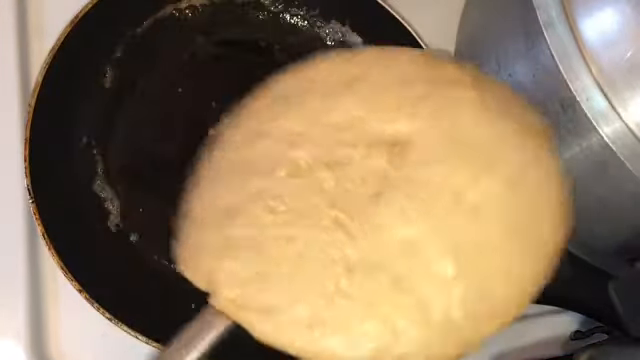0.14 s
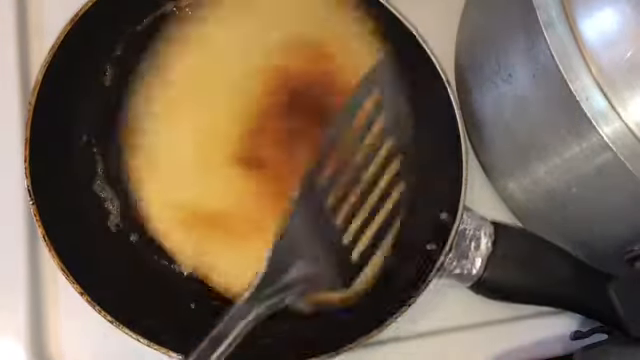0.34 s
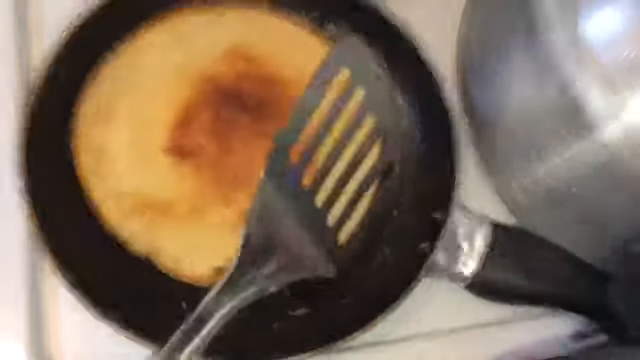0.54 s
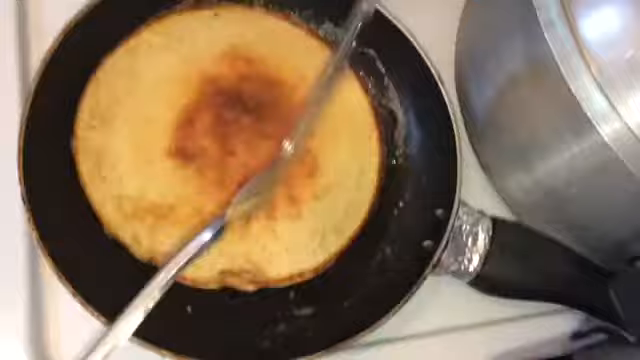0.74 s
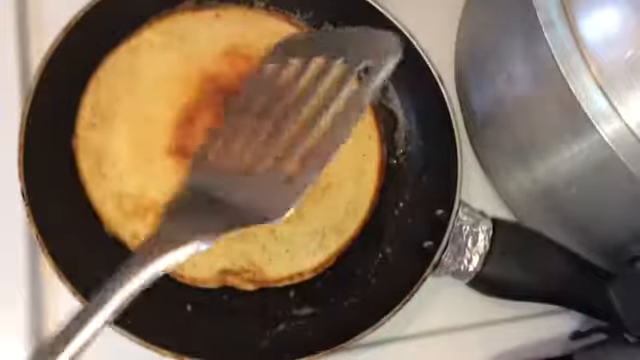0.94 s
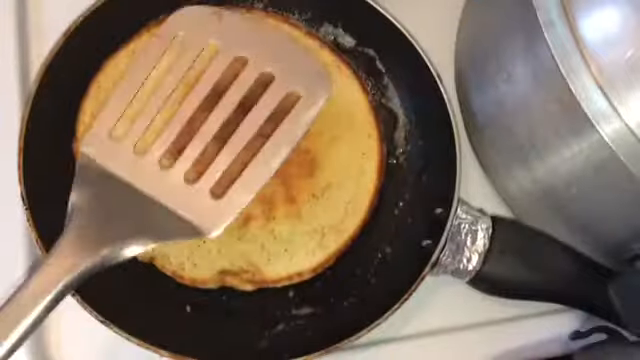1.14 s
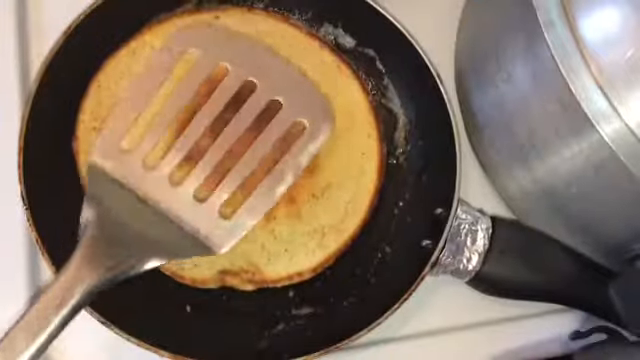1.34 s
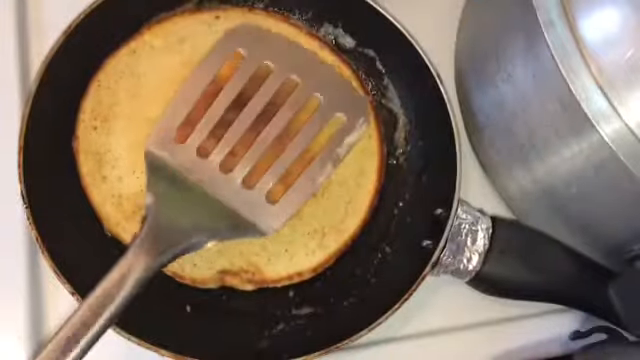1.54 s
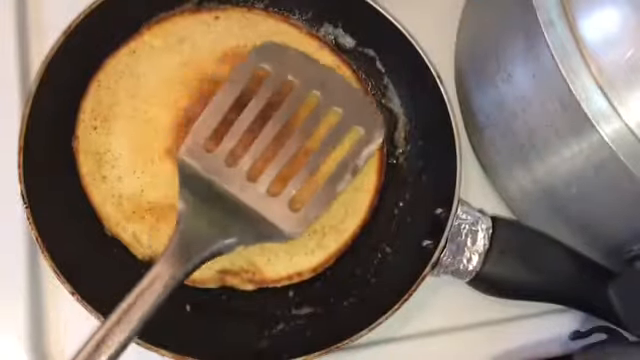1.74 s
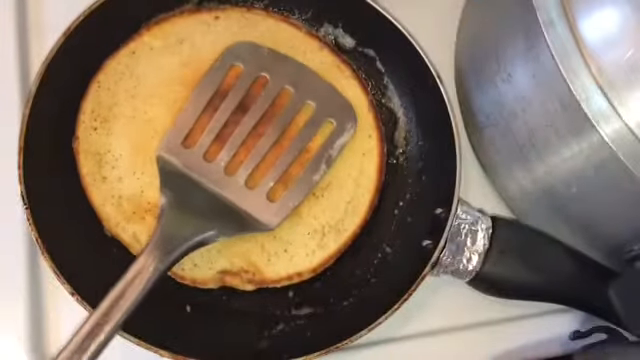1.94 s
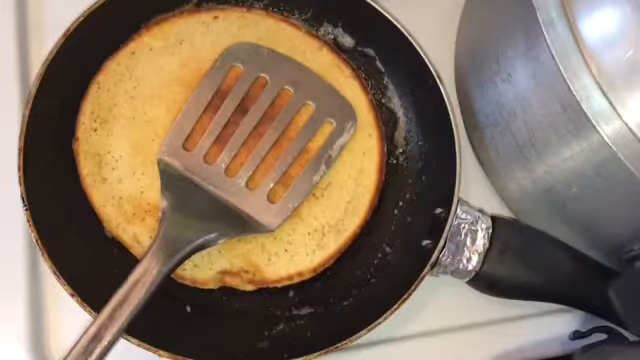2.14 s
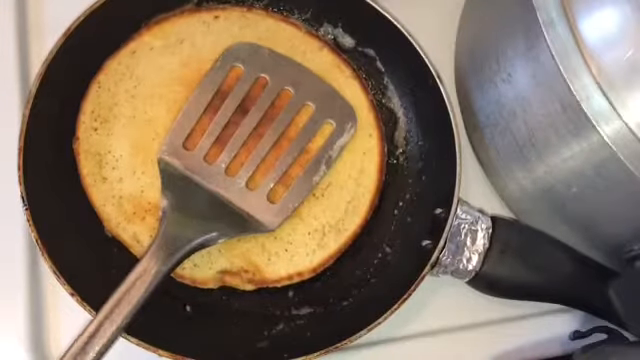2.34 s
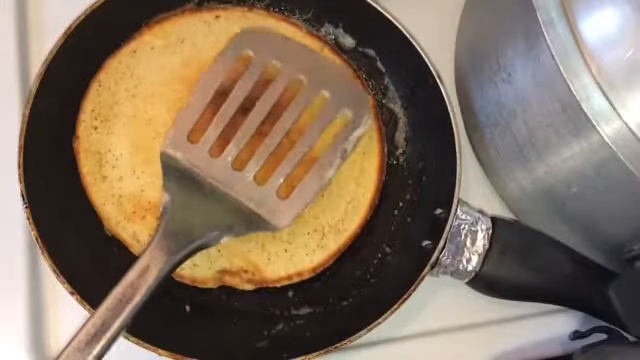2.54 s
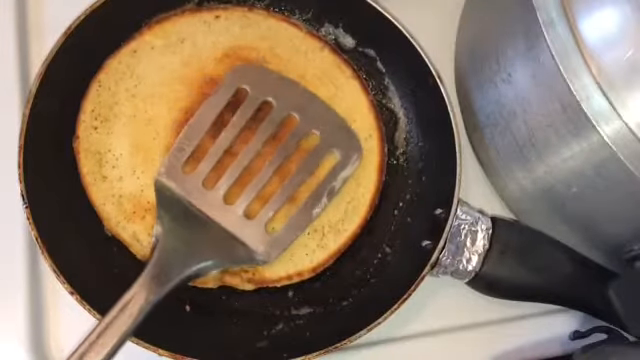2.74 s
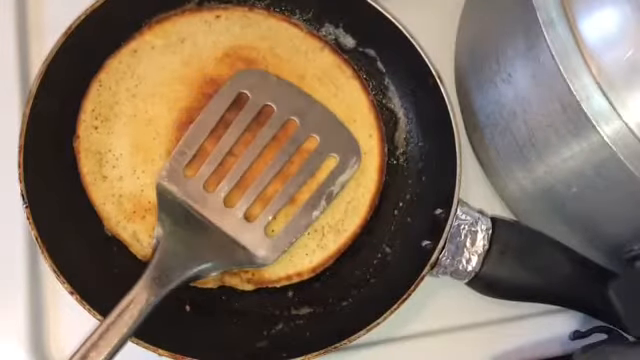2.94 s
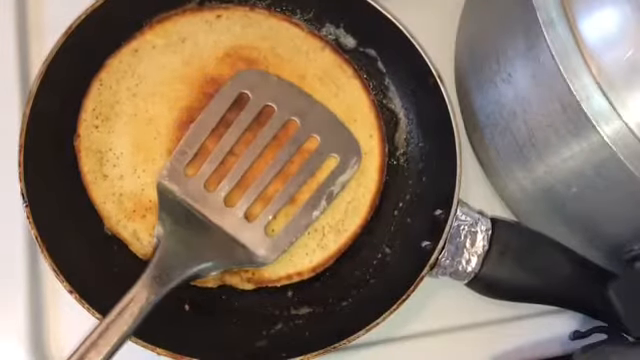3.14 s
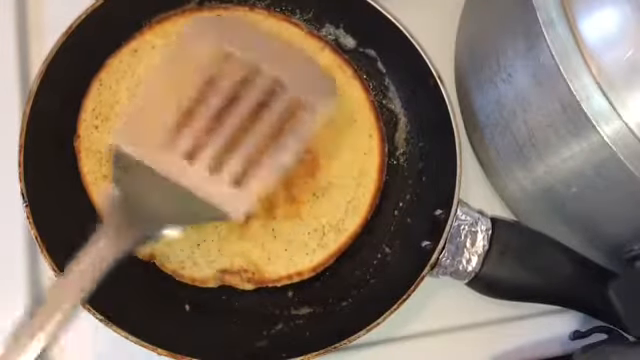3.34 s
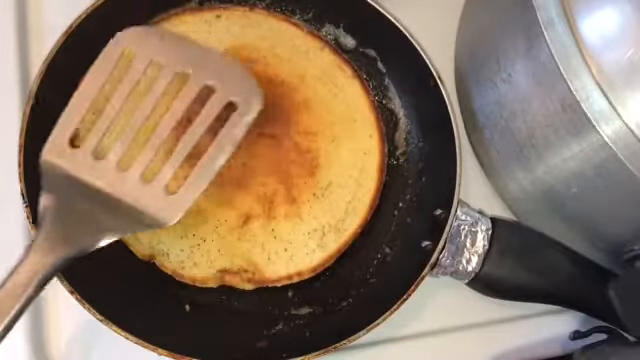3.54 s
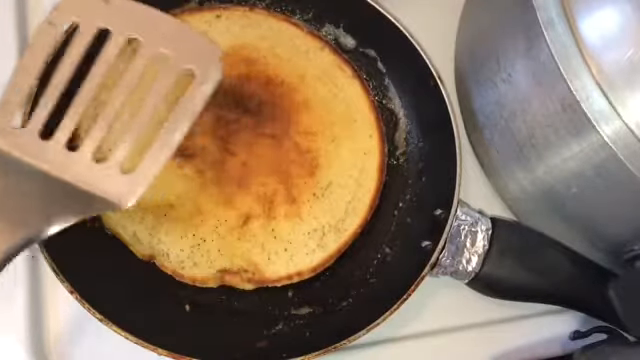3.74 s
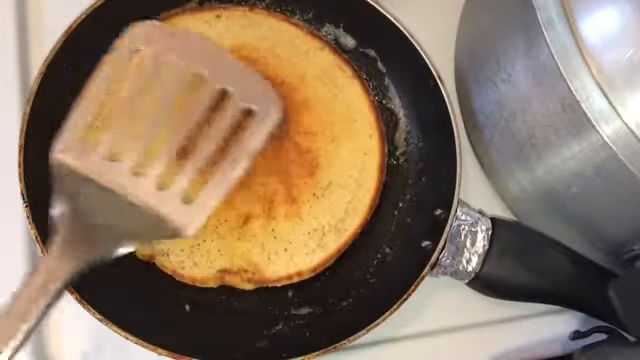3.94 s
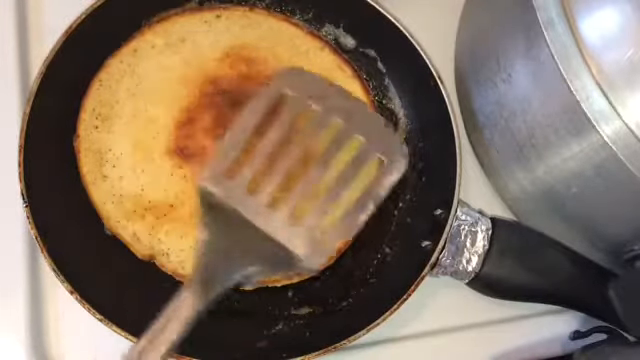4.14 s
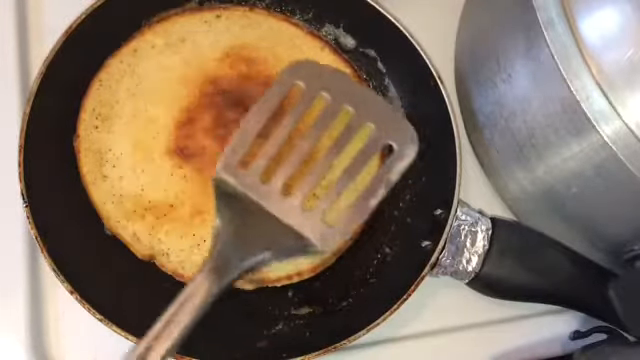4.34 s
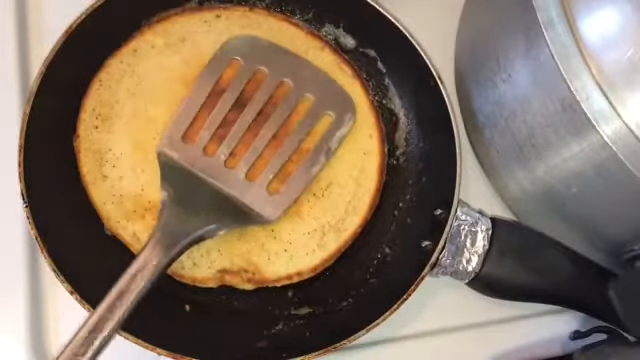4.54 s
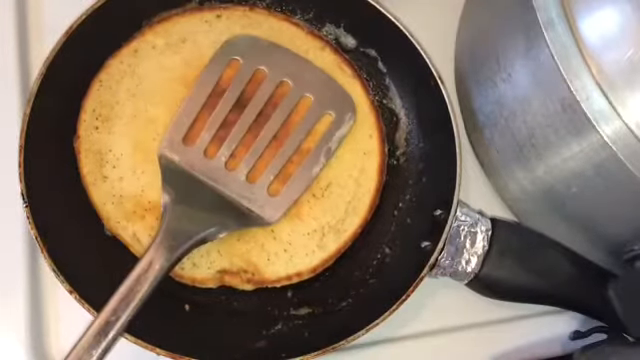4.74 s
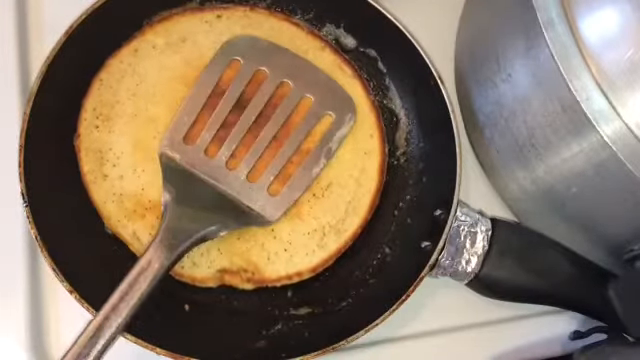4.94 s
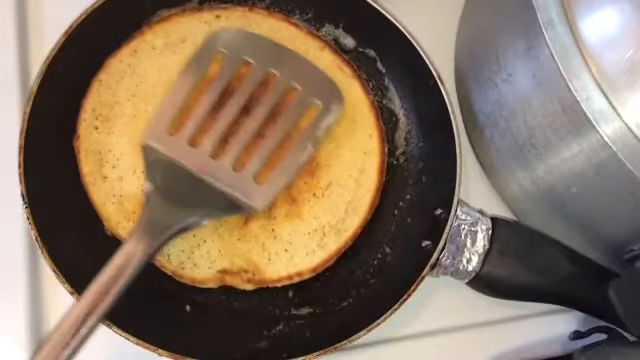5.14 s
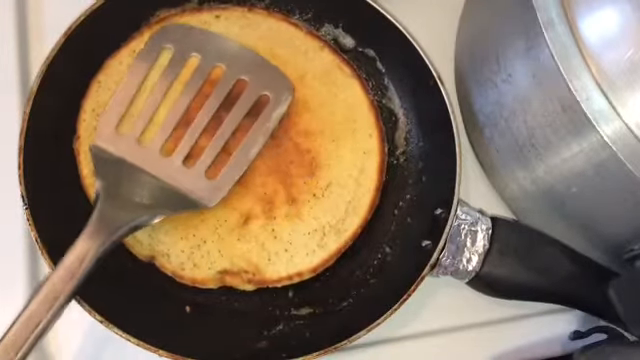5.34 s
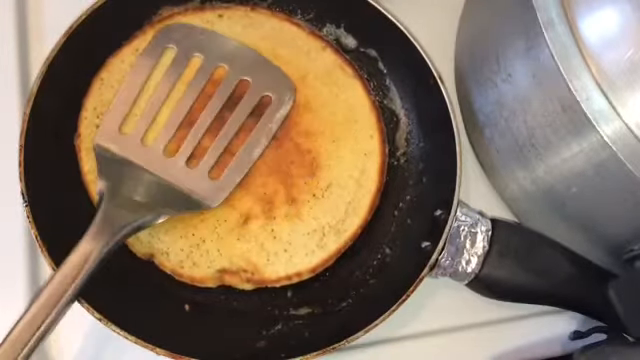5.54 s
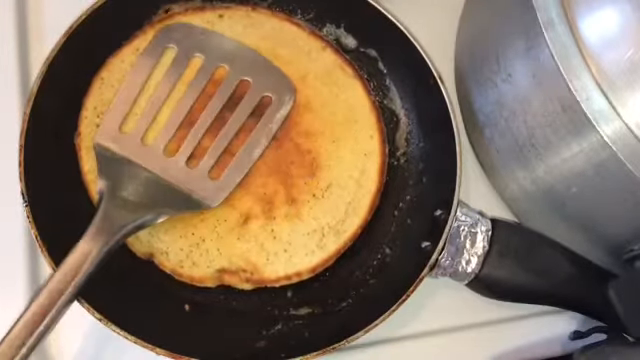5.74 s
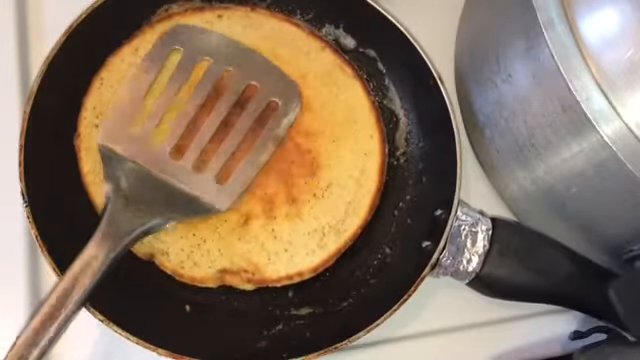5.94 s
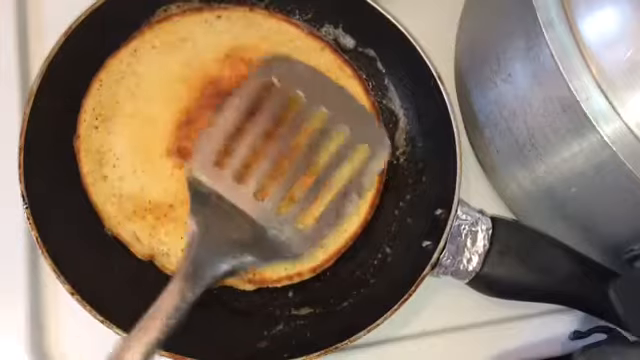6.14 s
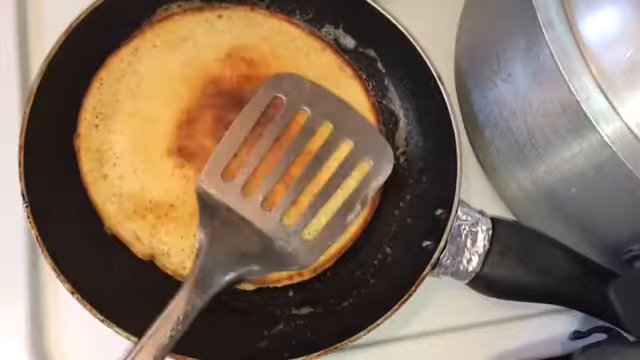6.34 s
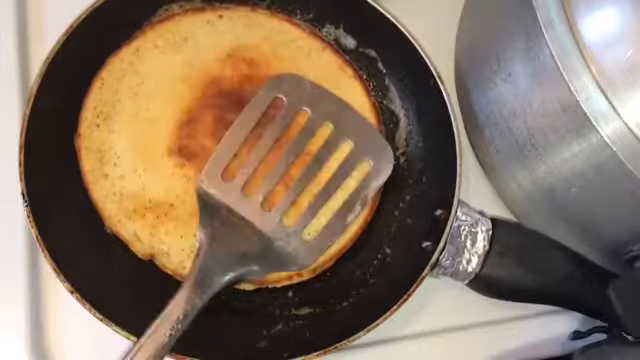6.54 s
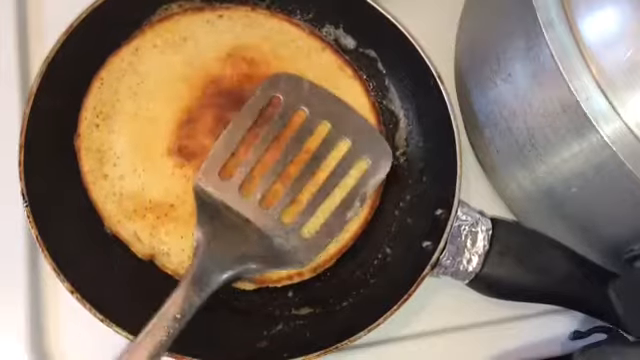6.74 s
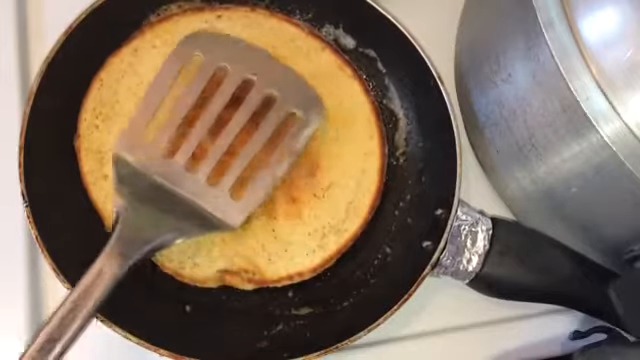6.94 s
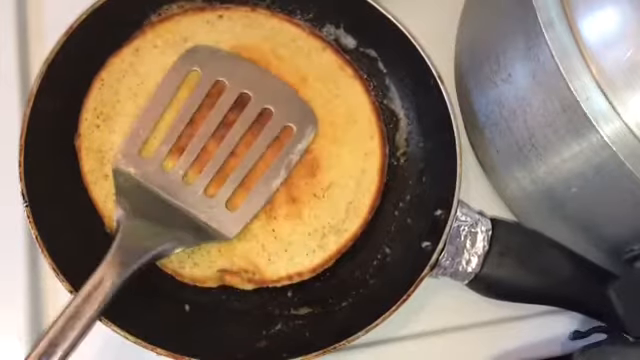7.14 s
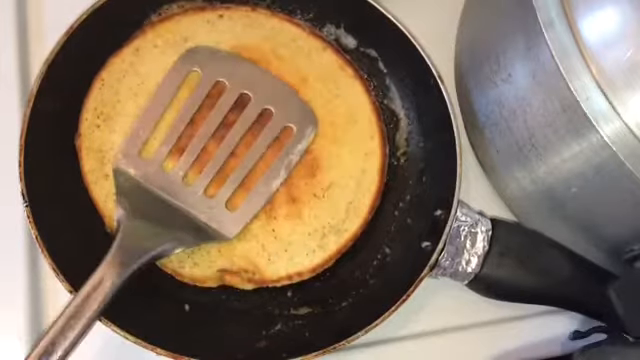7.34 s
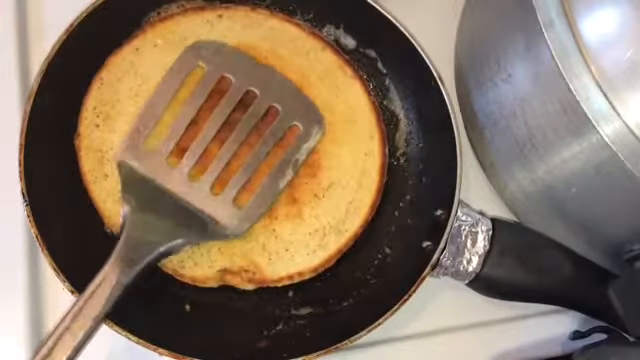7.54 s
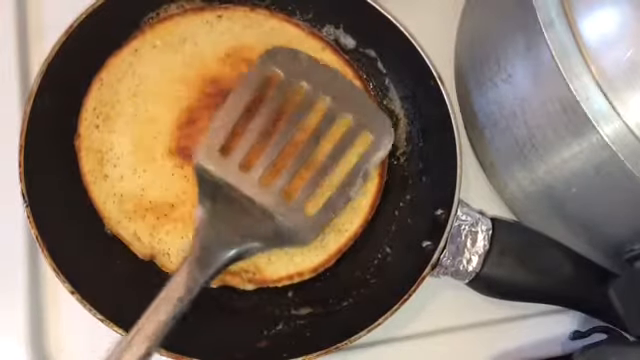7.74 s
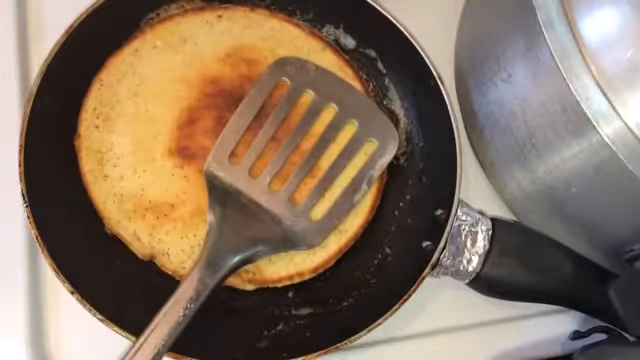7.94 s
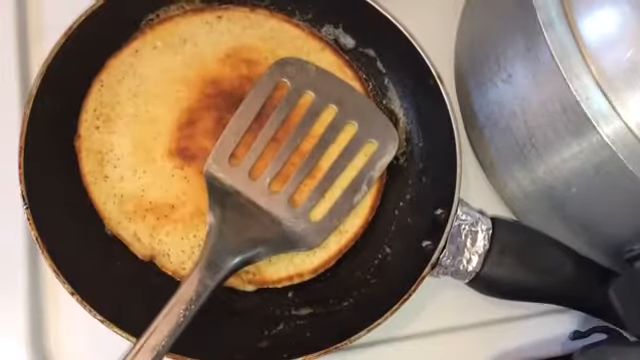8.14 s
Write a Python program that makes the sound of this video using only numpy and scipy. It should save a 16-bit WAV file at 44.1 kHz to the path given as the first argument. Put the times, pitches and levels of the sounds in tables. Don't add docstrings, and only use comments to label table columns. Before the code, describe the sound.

Close up in a small kitchen, a pancake flops into a hot pan, which bangs, scrapes and rocks on the stove while a metal spatula chatters on its rim. Wet batter sets the fat hissing and crackling, with sharp spits and faint steam whistles. The frying soon calms to thin sizzle, sparse pops and dull soft pats. A fan hums quietly behind; a phone-like microphone is near.

```python
import sys
import numpy as np
from scipy import signal
from scipy.io import wavfile
from scipy.ndimage import uniform_filter1d

SR = 44100
rng = np.random.default_rng(int(sys.argv[2]) if len(sys.argv) > 2 else 0)


def makeup_ratio(level_db):
    decades = np.asarray(level_db, float) / 20
    return 10 ** decades


def digitize_waveform(pressure):
    field = np.atleast_2d(pressure).T
    bounded = np.clip(field, -1, 1)
    quanta = np.round(bounded * 32767).astype(np.int16)
    wavfile.write(sys.argv[1], SR, quanta)


N = 361380

# t/s, peak level/dB, struck note f/Hz, clack over thud/dB
KNOCK_EVENTS = [(.2694, -27.5, 163, -14), (.2893, -7, 168, -21), (.2955, -12.5, 168, -14),
                (.4278, -5, 1798, -2), (.4313, -12, 1800, -2), (.44, -13, 705, 2), (.453, -13, 403, -5),
                (.4686, -9, 420, -2), (.4768, -5, 1000, -2), (.4885, -14, 262, -10),
                (.5089, -13, 950, -3.5), (.5193, -8.5, 200, -6), (.5228, -15, 900, -3),
                (.5746, -17, 800, -5), (.5788, -21, 1000, 1), (.5838, -8.5, 450, -5), (.6288, -27, 600, 2),
                (.6546, -22.5, 570, -10.5)]
# t/s, peak level/dB, struck note f/Hz, clack
# over thud/dB
ROCK_EVENTS = [(.8303, -13, 640, -14), (.8477, -21, 161, -5), (.8731, -27.5, 625, -12),
               (.9075, -27, 560, -19), (.9434, -29, 172, -22), (1.0932, -40.5, 590, -3),
               (1.1314, -20.5, 606, -11), (1.1627, -25, 178, -29), (1.1991, -30.5, 436, -29),
               (1.3643, -42, 236, -8), (1.3812, -24.5, 584, -26.5), (1.4177, -35, 559, -26),
               (1.6183, -35, 300, -25), (1.9668, -38, 300, -2.5), (2.0742, -38, 185, -20.5),
               (2.1807, -37.5, 172, -19), (2.2527, -39, 161, -4)]
# f/Hz, level/dB, time to fade by 60 dB/s
PAN_MODES = [(168, 3, 0.07), (205, -8, .1), (279.7, -11.5, .1), (408, -4.5, .07), (458, -4, .07),
             (570, -5, 0.1), (695, -11.5, .07), (930, -9, .06), (1140, -8.5, 0.023), (1300, -12.5, 0.02),
             (1675, -8.5, 0.15), (1850, -9, 0.09), (2280, -19, .05)]


def evened(x):
    return x / np.sqrt(np.mean(x ** 2) + 1e-20)


def noise():
    return rng.standard_normal(N)


def wander(samples):
    return evened(uniform_filter1d(noise(), samples))


def add(mix, start_s, sound):
    part = mix[round(start_s * SR):][:len(sound)]
    part += sound[:len(part)]


def along(rows):
    s, level_db, *rest = np.transpose(rows)
    t = np.arange(N) / SR
    return [np.interp(t, s, level_db, -150, -150)] + [np.interp(t, s, c) for c in rest]


def colour(x, points):
    f, db = np.transpose(points)
    bin_hz = abs(np.fft.fftfreq(8192, 1 / SR)) + 1
    log_gain = np.interp(np.log(bin_hz), np.log(f), np.maximum(db, -90)) * np.log(10) / 20
    taps = np.fft.ifft(np.exp(np.conj(signal.hilbert(log_gain)))).real[:4096]
    return evened(signal.oaconvolve(x, taps)[:len(x)])


def band(x, lo_hz, hi_hz):
    sos = signal.butter(2, [lo_hz, hi_hz], "band", fs=SR, output="sos")
    return evened(signal.sosfilt(sos, x))


def high_pass(x, order, hz):
    return signal.sosfilt(signal.butter(order, hz, "high", fs=SR, output="sos"), x)


def resonate(x, hz, width):
    turn = np.exp(2j * np.pi * np.cumsum(hz * np.ones(len(x))) / SR)
    r = np.exp(-np.pi * width / SR)
    return 2 * (turn * signal.lfilter([1 - r], [1, -r], x / turn + 1e-18)).real


def tone_noise(hz, width, width_2):
    return evened(resonate(resonate(noise(), hz, width), hz, width_2))


def clicks(per_s, spread_db):
    size = makeup_ratio(spread_db * np.minimum(rng.exponential(1, N), 3.8)) * rng.choice([-1., 1.], N)
    return size * (rng.random(N) < per_s / SR)


def ring(modes, spread_db, near_hz=400):
    hz, db, t60 = np.transpose(modes)[:, :, None]
    t = np.arange(8820) / SR
    loud_luck, tune_luck, sign_luck = rng.standard_normal((3, len(modes), 1))
    db = db + spread_db * loud_luck - 3.3 * abs(np.log2(hz / near_hz))
    tones = np.sin(2 * np.pi * hz * (1 + .02 * tune_luck) * t)
    x = (np.sign(sign_luck) * makeup_ratio(db - 60 * t / t60) * tones).sum(0)
    return x / abs(x).max()


def kitchen():
    # f/Hz, level/dB per Hz
    air_colour = [(15, -29.5), (25, -15), (92, -7), (117, -14.5), (149, -3.5), (175, -11.5), (354, -20),
                  (545, -16), (1560, -27.5), (2110, -16.5), (2280, -30.5), (14400, -34), (16000, -52.5)]
    # f/Hz, level/dB
    motor_tones = [(148, -75.5), (296, -78), (444, -84.5)]
    # f/Hz, width/Hz, level/dB
    fan_tones = [(533, 11, -79.5), (1047, 270, -75.5), (1332, 300, -77.5), (2091, 130, -70.5)]
    # t/s, level/dB, f/Hz
    drone_curve = [(0, -68, 86), (1.05, -65, 86), (2.3, -63.5, 85), (2.7, -72, 87), (3.0, -58, 90),
                   (3.25, -77, 92), (3.55, -60, 88), (4.0, -66.5, 83), (4.8, -55.5, 77), (5.1, -67.5, 76),
                   (5.5, -74, 80), (5.9, -76, 85), (6.25, -67, 94), (6.7, -65.5, 88), (7.6, -77, 90),
                   (8.19, -62.5, 86)]
    t = np.arange(N) / SR
    air = makeup_ratio(-58.5 - 5) * colour(noise(), air_colour)
    hum = sum(makeup_ratio(db + 4) * np.sin(2 * np.pi * hz * t) for hz, db in motor_tones)
    fan = sum(makeup_ratio(db) * tone_noise(hz, w, w) for hz, w, db in fan_tones)
    waver = makeup_ratio(2.5 * wander(9000))
    drone_db, drone_hz = along(drone_curve)
    drone = makeup_ratio(drone_db) * evened(resonate(noise(), drone_hz, 12))
    return air + hum + fan * waver + drone


def spit(hz):
    t = np.arange(-44, 220) / SR
    burst = np.sin(2 * np.pi * (hz * t + rng.random())) * np.exp(-abs(t * hz / .52) ** 1.3)
    tearing, droplets = .03 * np.exp(t / .0005), .05 * np.exp(-t / .0018)
    return burst + np.diff(rng.standard_normal(len(t) + 2), 2) * np.where(t < 0, tearing, droplets)


def many_spits(per_s, spread_db, sizes_hz, loudness=1):
    return sum(signal.oaconvolve(clicks(per_s, spread_db) * loudness, spit(hz))[:N] for hz in sizes_hz)


def large_spits():
    # t/s, peak level/dB,
    # bubble f/Hz
    big_spits = [(0.9412, -22, 8900), (0.948, -28, 11400), (1.035, -26, 10500), (1.0544, -28, 8500),
                 (1.0674, -19, 10700), (1.0725, -28, 11000), (1.0948, -31, 6800), (1.1327, -27, 5800),
                 (1.1345, -24, 8400), (1.1685, -24, 9300), (1.173, -29, 11700), (1.1816, -23, 8700),
                 (1.2412, -25, 11800), (1.2874, -28, 11000), (1.3126, -30, 11600), (1.3439, -26, 8500),
                 (1.3685, -26, 11200), (1.3827, -27, 8200), (1.3888, -30, 9700), (1.3935, -29, 11600),
                 (1.4451, -26, 9900), (1.4476, -28, 11900), (1.4529, -27, 10200), (1.4649, -27, 11500),
                 (1.4703, -19, 11200), (1.5116, -16, 9700), (1.5334, -29, 11500), (1.58, -19, 10200),
                 (1.6037, -21, 9400), (1.6084, -19, 8500), (1.6108, -28, 8900), (1.6147, -24, 11900),
                 (1.6399, -27, 10500), (1.6435, -30, 12600), (1.6463, -20, 11500), (1.652, -26, 10700),
                 (1.6641, -27, 10100), (1.6682, -19, 9600), (1.6711, -17, 8500), (1.6732, -27, 10600),
                 (1.6777, -19, 9200), (1.6818, -17, 10400), (1.7009, -20, 8800), (1.7137, -25, 9900),
                 (1.7235, -10, 9700), (1.74, -17, 8700), (1.7431, -26, 12000), (1.7541, -28, 10300),
                 (1.7556, -26, 11100), (1.7585, -27, 12000), (1.7693, -23, 11500), (1.7818, -22, 9500),
                 (1.8143, -21, 8800), (1.8626, -28, 12400), (1.8774, -25, 10500), (1.881, -28, 9100),
                 (1.9184, -23, 11600), (1.935, -27, 11800),
                 (1.9674, -29, 10000), (1.9699, -32, 11000), (1.9849, -31, 10200), (2.0024, -33, 11700),
                     (2.0378, -32, 8900), (2.0547, -28, 8600), (2.0663, -28, 11600), (2.0765, -28, 11700),
                     (2.0788, -27, 12200), (2.0841, -21, 11500), (2.0953, -25, 12400), (2.1008, -32, 13100),
                     (2.1191, -26, 10600), (2.1433, -31, 10700), (2.1447, -32, 11000), (2.2298, -25, 9800),
                     (2.2331, -32, 9900), (2.2376, -28, 7600), (2.2464, -28, 9000), (2.3876, -29, 9700),
                     (2.4812, -28, 10100), (2.4866, -26, 7000), (2.5403, -34, 6900), (2.5913, -23, 9600),
                     (2.6073, -33, 11400), (2.6151, -20, 9300), (2.6578, -26, 7800), (2.7697, -34, 8000),
                     (2.8155, -23, 8500), (2.817, -31, 8900), (2.8377, -33, 11500), (2.8556, -34, 9600),
                     (2.8942, -27, 9100), (2.9, -31, 7800), (3.0339, -23, 8000), (3.1253, -30, 8500),
                     (3.1488, -34, 7000), (3.1689, -33, 9600), (3.3185, -31, 10000), (3.3605, -17, 10100),
                     (3.4287, -33, 11000), (3.5478, -28, 5800), (3.5969, -20, 10300), (3.5984, -26, 8900),
                     (3.6062, -28, 9400), (3.8838, -28, 7600), (3.9079, -32, 7000), (3.9121, -29, 9600),
                     (4.2875, -32, 10200), (4.4084, -28, 8000), (4.4192, -33, 10600), (4.4591, -29, 8700),
                     (4.4712, -35, 10800), (4.4809, -34, 6200), (4.5336, -31, 6900), (4.5494, -30, 9000),
                     (4.5595, -31, 9500), (4.5809, -34, 11100),
                 (4.7505, -32, 4100), (4.7542, -28, 10600), (4.865, -31, 10400), (4.8888, -34, 9600),
                  (4.9216, -36, 8400), (4.9995, -35, 9500), (5.0534, -36, 10500), (5.186, -35, 8800),
                  (5.2451, -36, 10100), (5.2948, -28, 9800), (5.3517, -30, 9900), (5.3751, -26, 9200),
                  (5.4109, -32, 7000), (5.435, -35, 10800), (5.5505, -34, 5200), (5.639, -21, 6400),
                  (5.7392, -23, 8200), (5.798, -35, 8600), (5.8248, -35, 6300), (5.8421, -26, 7700),
                  (5.8753, -34, 9400), (5.988, -34, 9800), (6.0023, -32, 7900), (6.0455, -25, 11000),
                  (6.0744, -28, 8800), (6.1468, -33, 10000), (6.1967, -30, 10500), (6.2219, -34, 8000),
                  (6.2246, -35, 9400), (6.2911, -35, 10000), (6.4441, -33, 9400), (6.4892, -34, 11300),
                  (6.5004, -30, 8100), (6.5755, -34, 9600), (6.5874, -29, 11200), (6.5956, -30, 7700),
                  (6.6028, -35, 9400), (6.7365, -34, 8800), (6.7677, -34, 9800), (6.8958, -36, 10500),
                  (6.9321, -28, 9800), (7.062, -33, 10900), (7.1755, -37, 8800), (7.2186, -34, 11100),
                  (7.4132, -36, 8100), (7.4401, -30, 9200), (7.4705, -33, 9700), (7.4722, -28, 10700),
                  (7.4904, -33, 9200), (7.7032, -31, 10900), (7.7291, -25, 10500), (7.7787, -25, 9300),
                  (7.7932, -30, 9900), (7.8086, -37, 8100), (7.8195, -32, 11700), (7.9833, -30, 7000),
                  (8.041, -31, 7700), (8.1251, -36, 7800)]
    out = np.zeros(N)
    for s, db, hz in big_spits:
        add(out, s - 1 / 1000, makeup_ratio(db + 1.6) * spit(1.08 * hz))
    return out


def steam_whistle():
    # t/s, level/dB, f/Hz
    whistles = [
        [(0.76, -48, 1740), (0.82, -45, 1740), (1.12, -69, 1820)],
        [(1.68, -73, 1780), (1.77, -47, 1765), (2.2, -71, 1760)],
    ]
    out = np.zeros(N)
    for rows in whistles:
        steam_db, hz = along(rows)
        out += makeup_ratio(steam_db - 5) * tone_noise(hz, 270, 250)
    return out


def fat():
    # t/s, steam flow level/dB, vigour of boiling/dB
    frying = [(.24, -74, -8), (.405, -68, -8), (.435, -41, -8), (.59, -53, -3), (.97, -57, 17),
              (1.4, -55.5, 15), (1.74, -53.5, 14), (1.9, -55, 9), (2.1, -55.5, 10.5), (2.61, -56.5, .1),
              (4, -59, -6), (4.5, -57.5, .3), (5.1, -58, -8), (6.3, -58, -8), (6.6, -56.5, -4),
              (7, -58.5, -8), (7.88, -58.5, -8), (8.19, -56, -12)]
    # f/Hz, level/dB per Hz
    hiss_colour = [(880, -40.5), (1500, -12), (2080, -6.5), (2810, -6.5), (4220, -12), (6550, -3),
                   (9560, -7.5), (12500, -4), (15300, -9.5), (15700, -13.5), (16200, -51.5)]
    hiss_db, vigour_db = along(frying)
    boil = np.clip(wander(900), -2, 2)

    crackle = many_spits(110, 3.7, np.geomspace(6000, 14000, 8), makeup_ratio(2.67 * boil))
    pops = makeup_ratio(hiss_db - 3 + .2 * vigour_db) * evened(crackle)
    spits_per_s = 38 / 4 * makeup_ratio(.5 * vigour_db + 4 * boil)
    spits_per_s *= np.arange(N) > .9 * SR
    pops += makeup_ratio(-43) * many_spits(spits_per_s, 2.4, (7500, 9500, 11500, 14000))
    pops = high_pass(pops + large_spits(), 2, 2200)

    hiss = colour(noise(), hiss_colour) * makeup_ratio(1.7 * boil)
    slow_boil = evened(uniform_filter1d(boil, 6000))
    fine = band(clicks(2000, 3.8), 9000, 21000) * makeup_ratio(2.8 * boil + 2.2 * slow_boil)
    return pops + makeup_ratio(hiss_db) * (hiss + makeup_ratio(vigour_db - 12.5) * fine) + steam_whistle()


def knock(db, hz, clack_db, t60, body_db, damp_db_per_s):
    t = np.arange(8820) / SR
    fade = makeup_ratio(-60 * t / np.clip(t60, .006, .3))
    rise_turns = .2 * max(-37 - db, 2.5)
    note = -np.sin(2 * np.pi * hz * t) * fade * np.minimum(t * hz / rise_turns, 1)
    crowd = np.cos(2 * np.pi * hz * t * rng.uniform(.05, .14, (2, 1))).sum(0)
    rough = note * .42 * (1 + crowd)

    top_hz = np.clip(900 * 2 ** ((clack_db + 16.5) / 14), 600, 3000)
    slap = band(rng.standard_normal(len(t)), 333, top_hz) * makeup_ratio(-60 * t / .043)
    body = .5 * ring(PAN_MODES, 1.0, near_hz=top_hz * .26) + .51 * slap
    body = body * makeup_ratio(-damp_db_per_s * t)

    metal = band(rng.standard_normal(len(t)), 1700, 11000)
    patches = sum(evened(resonate(metal, f, 350)) for f in rng.uniform(2500, 7500, 3))
    metal = evened(.6 * metal + .25 * patches)
    clack = metal * (makeup_ratio(-60 * t / .014) + .17 * makeup_ratio(-60 * t / .08))

    high = np.clip(hz / 1300, 0, .9)
    struck = 1.54 * (1 - high) * note + 1.04 * high * rough
    return makeup_ratio(db) * (struck + makeup_ratio(body_db) * body + makeup_ratio(clack_db - 9.5) * clack)


def blows():
    # t/s, peak level/dB, struck note f/Hz, clack over thud/dB
    pats = [(2.8341, -49, 700, 4), (3.1093, -32, 177, -29), (3.1115, -37, 520, -24), (3.1293, -37, 199, -7),
            (3.2443, -47, 161, -11), (4.5985, -36, 190, -12), (4.5995, -41, 500, -3),
            (4.7505, -33, 560, -19), (4.775, -45, 560, -20), (4.797, -43, 560, -12),
            (4.9983, -44.5, 180, .4), (5.375, -43, 300, -4), (5.4043, -45.5, 150, 6.5),
            (5.5264, -29, 171, -19.5), (5.5268, -29.5, 520, -17), (5.5434, -33, 190, -23.5),
            (5.9338, -48, 177, 2.1), (6.2498, -48, 600, 5), (6.441, -40.5, 190, -18),
            (6.611, -38.5, 187, -14), (6.612, -46, 540, -14), (6.6888, -40, 183, -8),
            (6.709, -40, 185, -12), (6.8567, -51.5, 543, -5.5), (7.0652, -40, 552, -6),
            (7.068, -36, 176, -30), (7.1911, -44.5, 177, -4), (7.301, -37, 565, -23),
            (7.4984, -47, 134, .1), (7.6899, -53, 193, 1.1)]
    # t/s, peak level/dB, struck note f/Hz, clack over thud/dB
    ticks = [(.2502, -34, 1500, 7), (.2983, -18, 1720, -12), (.3035, -17, 1140, -17),
             (.3125, -19, 1140, -17), (.3215, -23, 1140, -17), (.333, -27, 1140, -14),
             (.3567, -42, 6390, 2.5), (.6213, -21.5, 6230, 6.5), (.6798, -25.5, 3330, -1.1),
             (.7099, -19, 3350, 5.5), (.83, -13.5, 784, -11), (.8304, -14, 1150, -8),
             (.8345, -21, 1900, -1), (.8487, -33, 7000, 3), (1.095, -44, 2980, -6),
             (4.7494, -34, 2429, -11), (6.593, -40, 5600, -10), (7.2982, -32, 2200, -24)]
    out = np.zeros(N)
    # events, pan body level/dB, cake damping/(dB/s)
    kinds = [(KNOCK_EVENTS, -2.5, 0), (ROCK_EVENTS, 1.2, 0), (pats, -1.5, 450), (ticks, -8, 0)]
    for rows, body_db, damp_db_per_s in kinds:
        for s, db, hz, clack_db in rows:
            t60 = .024 if rows is ticks else .016 - .00052 * db
            off_octaves = abs(np.log2(hz / 500))
            add(out, s, knock(db, hz, clack_db, t60, body_db - 4 * off_octaves, damp_db_per_s))
    return out


def rattle():
    # t/s, rumble level/dB, scrape level/dB, fall/(dB/s)
    moves = [(.25, -45, -35, 200), (.276, -44, -32, 170), (.403, -40, -31, 100), (.428, -17, -22, 140),
             (.577, -28, -27, 150), (.682, -40, -40, 90), (.71, -36, -33, 110), (.83, -22, -42, 260),
             (1.11, -34.5, -50, 125), (1.37, -38.5, -58, 100), (1.61, -48, -66, 30), (2.03, -50, -70, 20),
             (5.93, -56, -68, 300), (6.43, -52, -66, 75), (6.6, -52, -64, 45), (7.19, -51, -66, 130),
             (7.49, -55, -68, 85)]
    # f/Hz, level/dB per Hz
    scrape_colour = [(530, -35.5), (900, -12.5), (1120, -15), (2960, -16.5), (5280, -21), (8250, -26.5),
                     (12900, -27), (16000, -54.5)]
    rumble = evened(sum(signal.oaconvolve(clicks(60, 4.3), ring(PAN_MODES, 2.6, near_hz=hz))[:N]
                        for hz in np.geomspace(170, 1500, 8)))
    slips = makeup_ratio(2.2 * wander(160))
    scrape = colour(clicks(3000, 3.0) * slips, scrape_colour)
    length_s, rise_s = .42, .012
    t, shake, slide = np.arange(0, length_s, 1 / SR), np.zeros(N), np.zeros(N)
    edges = np.minimum(t / rise_s, 1) * np.minimum((length_s - t) / .08, 1)
    for s, rumble_db, scrape_db, fall in moves:
        add(shake, s, edges * makeup_ratio(rumble_db - 8 - fall * t))
        add(slide, s, edges * makeup_ratio(scrape_db - 5 - 1.3 * fall * t))
    return shake * rumble + slide * scrape


def landing_puff():
    # start t/s, peak t/s, end t/s, level/dB
    puff = (.27, .29, 0.35, -39)
    *times, db = puff
    puff_db = np.interp(np.arange(N) / SR, times, [db - 11, db, db - 23], -150, -150)
    return makeup_ratio(puff_db) * band(noise(), 6000, 16500)


def pan():
    return high_pass(blows() + rattle() + landing_puff(), 3, 125)


def stove():
    t, level = np.arange(SR // 2) / SR, np.zeros(N)
    for s, db, *_ in [*KNOCK_EVENTS[3:], *ROCK_EVENTS[:4]]:
        add(level, s, np.minimum(t / .03, 1) * makeup_ratio(-22 + 1.9 * db - 150 * t))
    boom = evened(resonate(noise(), 88, 12))
    thump = band(noise(), 28, 70)
    return level * (boom + makeup_ratio(-11.5) * thump)


def blade():
    # t/s, peak level/dB, struck note f/Hz
    bounces = [(.6797, -22, 3000), (.6835, -28, 1400), (.6935, -32, 1400), (.71, -20.5, 2500),
               (.7142, -20, 1300), (.719, -23, 1200), (.7234, -23, 1300), (.7275, -25, 1100),
               (.7335, -28, 2500), (.7405, -27, 1200), (.752, -32, 2000), (.7625, -34, 1500)]
    # f/Hz, level/dB, time to fade by 60 dB/s
    blade_modes = [(651, -5, .07), (947, -4, .06), (1249, -4, .07), (1450, -6, .05), (1750, -10, .08),
                   (2180, -14, .08), (2840, -8, .05), (3327, -5, .05), (3483, -5, .045), (4151, -10, .05),
                   (5480, -12, .05), (6675, -9, .03), (7440, -14, .04)]
    out = np.zeros(N)
    for s, db, hz in bounces:
        add(out, s, makeup_ratio(db) * ring(blade_modes, 2.5, near_hz=hz))
    return out


def room(x, t60=.21):
    t = np.arange(SR // 2) / SR
    echoes = rng.choice([-1., 1.], len(t)) * (rng.random(len(t)) < 2000 / SR) * (t > .003)
    low = signal.lfilter([.15], [1, -.85], echoes)
    tail = low * makeup_ratio(-60 * t / t60) * 3 + (echoes - low) * makeup_ratio(-60 * t / .12)
    return signal.fftconvolve(x, tail / np.linalg.norm(tail))[:N]


def scene():
    near = fat() + pan() + blade()
    return (kitchen() + near + stove() + makeup_ratio(-13.5) * room(near))[None]


def band_limit(x):
    return signal.sosfilt(signal.butter(12, 16480, fs=SR, output="sos"), x)


def record(dry):
    below, wide = (signal.oaconvolve(dry, signal.firwin(511, hz, window=("kaiser", 6), fs=SR)[None], "same")
                   for hz in (15400, 16500))
    heard = below + makeup_ratio(-37) * (wide - below)
    return band_limit(heard)


dry = scene()
out = record(dry)
digitize_waveform(out)
```